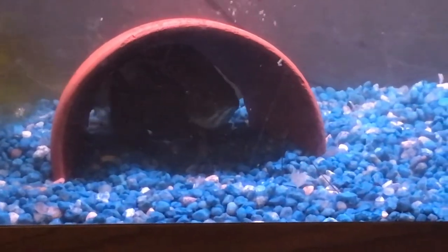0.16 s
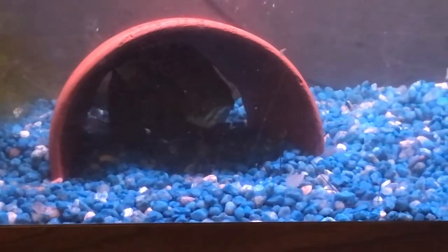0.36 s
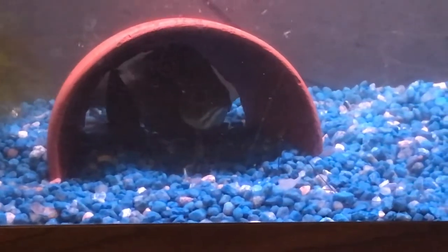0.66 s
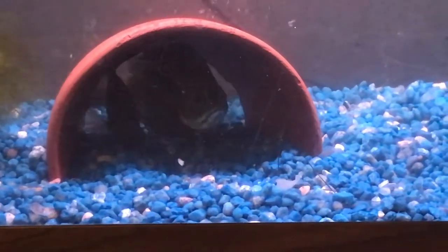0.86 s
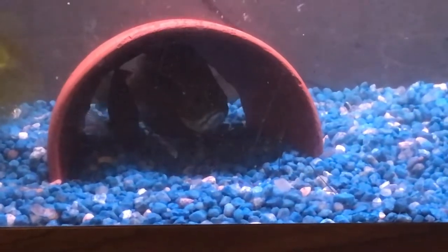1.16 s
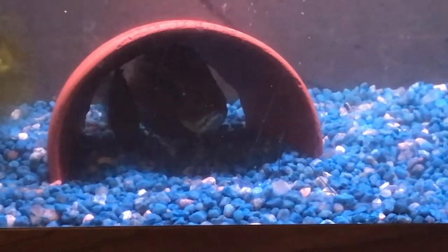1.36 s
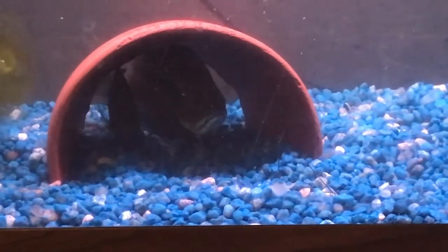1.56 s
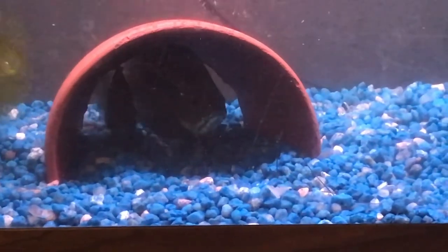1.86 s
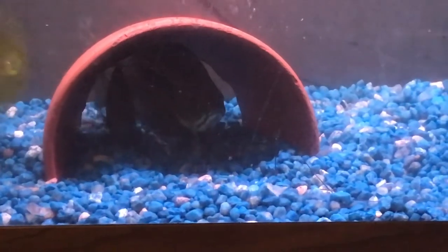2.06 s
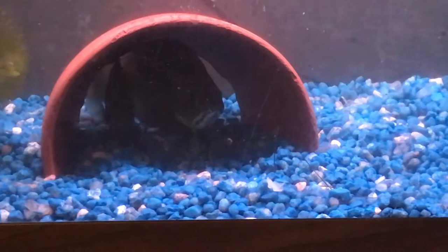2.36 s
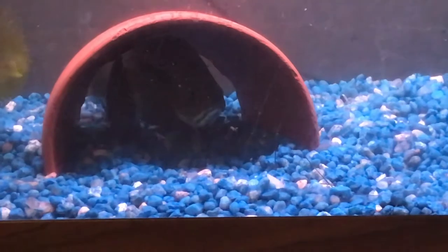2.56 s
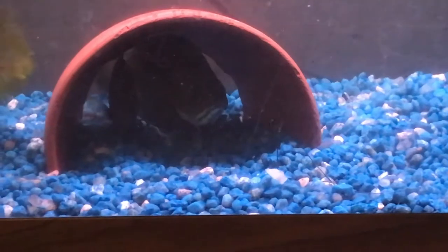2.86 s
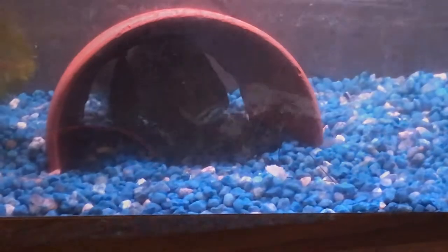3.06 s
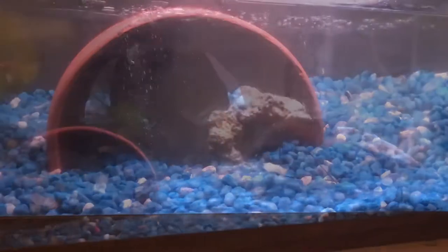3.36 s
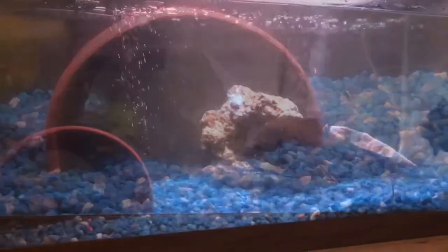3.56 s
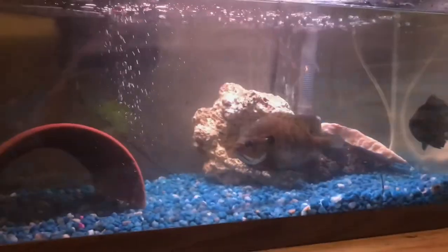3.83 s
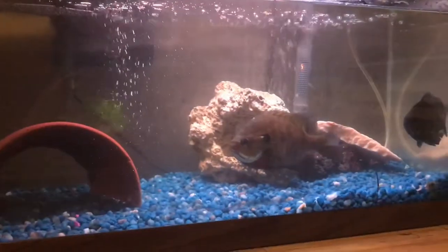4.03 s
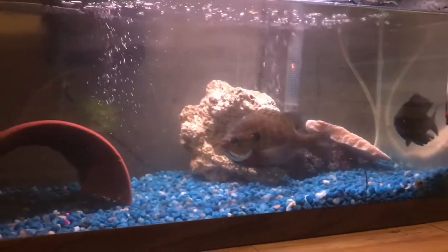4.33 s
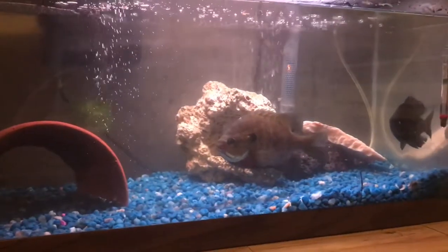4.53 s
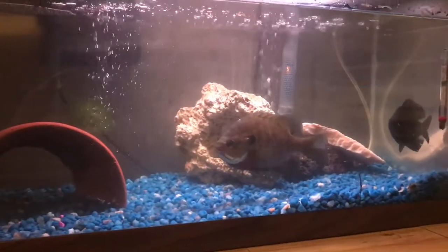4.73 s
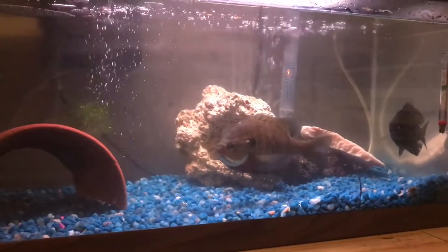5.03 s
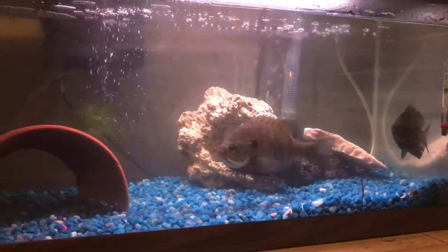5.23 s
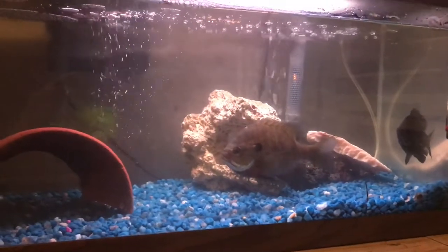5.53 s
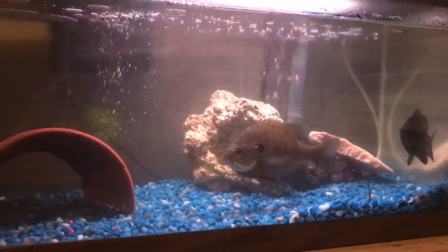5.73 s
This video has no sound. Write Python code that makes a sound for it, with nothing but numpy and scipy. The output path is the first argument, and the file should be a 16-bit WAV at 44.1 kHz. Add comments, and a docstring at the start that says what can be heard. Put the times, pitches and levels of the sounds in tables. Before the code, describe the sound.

From 0 to about 3 seconds, a microphone close to an aquarium picks up a steady low electric hum from an air pump, with a lumpy cabinet rumble that swells slowly, about twice a second. Soft water hiss lies over it. Short, bright, high-pitched bubbles plip irregularly, the stronger ones near 0.2, 0.8, 1.2, 1.8 and 2.5 seconds, among fainter neighbours and fine, crisp bursting ticks. Between 3 and 4 seconds the pump fades smoothly while a quieter sound from the front glass rises. From 4 to 6 seconds there is only faint mains hum and low soft noise, with weaker bubbles and delicate ticks, busier around 5.3 to 5.8 seconds. Fizz surges in small clusters near 4.5, 5.3 and 5.7. A filter impeller rattles dully in short, uneven, buzzing bouts, several a second. The room is quiet, with only a tiny glassy echo.

```python
"""An aquarium in a quiet room. First one hears the air pump's hum, a cabinet rumble and hissing water.
All along, bubbles ring at the surface (dying sine waves) and burst with fine ticks (short puffs of noise).
From about 3 to 4 s this cross-fades to the front glass: a faint mains hum made of overtones, softer water
with fizz in clusters, and a filter whose impeller rattles in bouts (noise knocks through two resonances)."""
import sys
import numpy as np
from scipy import signal
from scipy.fft import rfft, irfft, next_fast_len
from scipy.io import wavfile
from scipy.ndimage import uniform_filter1d, map_coordinates

SR = 44100
rng = np.random.default_rng(int(sys.argv[2]) if len(sys.argv) > 2 else 0)


def transcribe(u):
    """Save the signal u as a 16-bit wav file named by the first command-line argument.

    u: samples, shape (n,) or (channels, n), limited to [-1, 1]; the rate is SR.
    q: integer samples, one column per channel.
    """
    v = np.clip(np.atleast_2d(u).T, -1, 1)
    q = np.round(v * 32767).astype(np.int16)
    wavfile.write(sys.argv[1], SR, q)


N = 259749
TIME = np.arange(N) / SR  # seconds

# The cross-fade from the pump side to the front glass: start_s, end_s
FADE_S = (2.95, 3.994)
MAINS_HZ = 60.0
TOP_HZ = 15710  # nothing sounds above this
FRONT_FAINTER_DB = -4  # the faint bubbles are farther from the front glass


def amp(db):
    """Turn a level in dB into a gain."""
    return 10 ** (np.asarray(db) / 20)


def unit(x):
    """Scale to an rms of 1."""
    return x / np.sqrt(np.mean(x ** 2) + 1e-20)


def front_share(time_s):
    """Share of the front glass in the cross-fade: 0 before it, 1 after it."""
    return np.interp(time_s, FADE_S, (0, 1))


def wobble(rate):
    """A smooth random curve through `rate` random points a second."""
    points = rng.standard_normal(int(N * rate / SR) + 4)
    return map_coordinates(points, [TIME * rate])


def smoothed(x, first, second, axis=1):
    """Two moving averages, which soften fast changes."""
    return uniform_filter1d(uniform_filter1d(x, size=first, axis=axis), size=second, axis=1)


def filtered(x, response):
    """Filter x by a gain (it may be complex) that depends on frequency in Hz."""
    size = next_fast_len(N + SR // 2)
    hz = np.fft.rfftfreq(size, 1 / SR)
    return irfft(rfft(x, size) * response(hz), size)[:N]


def rush(spectrum, patchy_db):
    """Noise of rms 1, coloured by a spectrum, with random louder and softer patches in time and pitch."""
    grid = signal.stft(rng.standard_normal(N), nperseg=256)[2]
    patches = unit(smoothed(rng.standard_normal(grid.shape), 8, 6, axis=0))
    noise = signal.istft(grid * amp(patchy_db * patches), nperseg=256)[1][:N]
    hz, db = np.transpose(spectrum)
    return unit(filtered(noise, lambda f: amp(np.interp(np.log(f + 1), np.log(hz), db, -120, -120))))


def tones(rows, base_hz, unsteady_db, drift):
    """Sines at (multiple, rms dB) that waver in level and phase (turns), higher multiples more, up to 10."""
    total = 0
    for multiple, db in rows:
        gain = np.sqrt(2) * amp(db + unsteady_db * wobble(3.15))
        turns = multiple * base_hz * TIME + rng.random() + drift * min(multiple, 10) * wobble(14)
        total = total + gain * np.sin(2 * np.pi * turns)
    return total


def placed(times, shapes):
    """Add up short sounds, one per row, each at its start time in seconds."""
    at = np.round(times * SR).astype(int)[:, None] + np.arange(shapes.shape[1])
    return np.bincount(at.ravel(), shapes.ravel(), N + shapes.shape[1] + SR)[:N]


def rings(rows, glide, attack):
    """Bubbles ring as dying sines: rows (start s, dB, pitch Hz, s to fall 60 dB); each pitch glides at random."""
    hold = 1.7  # over 1: a bubble holds its level before it dies
    rough = .2  # churning water makes each ring flutter: share of its level
    start, db, hz, t60 = np.transpose(rows)[..., None]
    t = np.arange(SR // 16) / SR
    life = np.clip(t60, .004, .06)
    bend = glide * rng.standard_normal((len(rows), 1)) * t / life
    flutter = 1 + rough * unit(smoothed(rng.standard_normal((len(rows), len(t))), 40, 40))
    level = flutter * amp(db - 60 * (t / life) ** hold) * (1 - np.exp(-t / attack))
    return placed(start[:, 0], level * np.sin(2 * np.pi * hz * t * (1 + bend)))


def swarm(count, db, spread_db, hz, octaves, cycles):
    """Rows (start s, dB, pitch Hz, life s) of many events of scattered time, level and pitch."""
    shift, size, pitch = rng.standard_normal((count, 3)).T
    start = (np.arange(count) + .5 + 3 * shift) / count % 1 * N / SR
    pitch_hz = np.minimum(hz * 2 ** (octaves * pitch), TOP_HZ)
    return np.transpose([start, db + spread_db * np.clip(size, -2, 2), pitch_hz, cycles / pitch_hz])


def room(x):
    """The glass and the room add a short tail of fading noise echoes."""
    t60_s = 0.046
    t = np.arange(SR // 5) / SR
    tail = rng.standard_normal(len(t)) * amp(-60 * t / t60_s) * (t > .003)
    return x + amp(-8.5) * signal.fftconvolve(x, tail / np.linalg.norm(tail))[:N]


def pump_side():
    """The diaphragm hums at twice the mains over a lumpy cabinet rumble, the water's hiss and fine fizz."""
    # Pump hum: multiple of mains, level_db (rms)
    pump_tones = [(2, -39.5)]
    # Other steady tones beside the pump: pitch_hz, level_db (rms)
    whines = [(138, -58), (1233, -76), (1470, -84), (1938, -86)]
    # Spectrum of the cabinet rumble: pitch_hz, relative level_db per Hz
    throb = [(22, -40), (35, -4), (60, -12.5), (125, 1), (152, -4), (175, 0.5), (210, -12.5), (250, -11),
             (275, -15), (300, -12), (325, -14.5), (345, -14), (358, -8.5), (375, -15), (400, -21),
             (480, -26), (700, -36)]
    # Spectrum of the water close by: pitch_hz, relative level_db per Hz
    water_near = [(260, -40), (450, -1), (530, -6.5), (572, 0), (586, -2), (600, 4), (614, -3), (650, -2),
                  (740, -5), (878, -4), (1140, -4.5), (1230, -5), (1370, -7.8), (1980, -11), (2590, -16.5),
                  (3380, -14.5), (4970, -18.5), (6300, -18.5), (9390, -21.5), (10600, -26), (15600, -28)]
    hum = tones(pump_tones, MAINS_HZ, unsteady_db=0.0, drift=.008)
    whine = tones(whines, 1, unsteady_db=2.5, drift=.008)
    rumble = amp(-47 + 0.52 * wobble(11)) * rush(throb, patchy_db=0.9)
    hiss = amp(-59.5 + 0.4 * wobble(12)) * rush(water_near, patchy_db=1.4)
    small_bubbles = swarm(count=900, db=0, spread_db=2.8, hz=4300, octaves=.45, cycles=50)
    fizz = unit(rings(small_bubbles, glide=0.043, attack=0.00085))
    return hum + whine + rumble + hiss + amp(-72) * room(fizz)


def low_hum(share):
    """The motor slips just under the mains: by the pump it swells slowly, at the front it beats with mains hum."""
    motor_hz, motor_db = 58.8, -48.6
    swell_depth, swell_hz, crest_s = .33, 1.8, 1.1  # depth 0-1, swells a second, time of one crest
    front_mains_db, front_motor_db = -58.5, -67
    cancel_s = 4.77  # a moment when the two front hums cancel most
    angle = 2 * np.pi * np.outer([motor_hz, MAINS_HZ], TIME - cancel_s)
    motor, mains = np.sqrt(2) * np.sin(angle)
    swell = 1 + swell_depth * np.cos(2 * np.pi * swell_hz * (TIME - crest_s))
    near = amp(motor_db + 1.1 * wobble(5)) * swell * motor
    front = amp(front_mains_db) * mains - amp(front_motor_db) * motor
    return (1 - share) * near + share * front


def bubbles():
    """Clear and faint bubbles each ring as a close pair with a short pop, among a few fainter neighbours."""
    # The clear bubbles: start_s, level_db (before the trims below), pitch_hz
    clear = [(0.0453, -50.5, 3070), (0.0488, -53, 5260), (0.16, -48, 3230), (0.1845, -39, 3350),
             (0.2538, -48, 3100), (0.2927, -48.5, 3310), (0.2992, -44.5, 1970), (0.3326, -49, 3350),
             (0.3875, -48, 2130), (0.6524, -54, 3300), (0.7607, -37, 3330), (1.0665, -53, 3120),
             (1.0854, -52, 2800), (1.1927, -40, 3240), (1.3094, -53, 3370), (1.3314, -43, 3500),
             (1.3593, -51, 6010), (1.3912, -46.5, 2990), (1.4586, -53, 2990), (1.5239, -49, 3350),
             (1.5439, -41, 3330), (1.6526, -52, 5110), (1.71, -50, 3090), (1.7878, -51, 3120),
             (1.8257, -38, 4330), (2.0687, -41.5, 2980), (2.1241, -52, 3180), (2.125, -52, 4300),
             (2.1944, -48, 3570), (2.2383, -50, 3800), (2.2553, -42, 3040), (2.3281, -52, 5210),
             (2.3291, -52, 4430), (2.5122, -38, 3290), (2.5541, -52, 5580), (2.6594, -51, 3130),
             (2.7048, -51, 3330), (2.8883, -53, 3270), (2.9936, -52, 4300), (3.033, -45, 3350),
             (3.0834, -52, 6940), (3.0899, -44.5, 3060), (3.1388, -47, 3130), (3.1428, -50.5, 5830),
             (3.1842, -53, 4330), (3.2824, -47.5, 4250), (3.3268, -53, 4160), (3.3653, -51.5, 3220),
             (3.5324, -53, 3330), (3.932, -55, 2910), (4.0567, -53, 4550), (4.2113, -58, 3650),
             (4.4508, -56, 3480), (4.5246, -55, 3480), (4.5715, -58, 4130), (4.683, -57, 4120),
             (4.9721, -55, 4190), (5.0759, -56, 3420), (5.3018, -58, 2740), (5.3133, -51, 3090),
             (5.3462, -46, 4030), (5.455, -54, 4120), (5.6156, -49, 3520), (5.6705, -49, 4450),
             (5.7254, -55, 3050), (5.8002, -57, 3530), (0.0912, -55, 3480), (0.3591, -56, 3360),
             (0.5003, -56, 3430), (0.6, -56, 3330), (0.7457, -54, 3300), (0.9378, -57, 4700),
             (1.2805, -56, 5430), (2.0323, -55, 3310), (2.136, -51, 3150), (2.136, -55, 5900),
             (2.4548, -56, 4730), (2.7551, -55, 3310), (3.0135, -53, 2930), (3.4191, -58, 3310),
             (3.8627, -58, 3380), (4.1117, -60, 3150), (4.2533, -61, 3380), (4.4983, -62, 3030),
             (4.575, -59, 3550), (4.8764, -61, 3450), (4.9518, -58, 4090), (5.1129, -60, 3500),
             (5.1363, -59, 2790), (5.2506, -59, 2810), (5.375, -59, 4300), (5.455, -59, 2850),
             (5.6251, -60, 6180), (5.685, -57, 4100), (5.8667, -61, 3470)]
    ring_s, shorter_s_per_db = .025, .0005  # life of a -50 dB bubble; louder ones die sooner
    ring_hz = 4500  # bubbles pitched above this also die sooner
    faint = swarm(count=100, db=-62.5, spread_db=1.5, hz=3350, octaves=.09, cycles=1)[:, :3]
    faint[:, 1] += FRONT_FAINTER_DB * front_share(faint[:, 0])
    rows = np.vstack([clear, faint])
    life = (ring_s - shorter_s_per_db * (rows[:, 1] + 50)) * np.minimum(ring_hz / rows[:, 2], 1)
    rows = np.column_stack([rows, life])

    # columns: start, level, pitch, life
    twins = rows * [1, 1, 1, .8] - [0, 6, 0, 0]
    twins[:, 2] *= 2 ** (.08 * rng.standard_normal(len(rows)))
    pops = rows * [1, 1, 1.15, .15] - [0, 14, 0, 0]  # so short that the pitch blurs

    # three neighbours for each bubble
    start, db, hz, t60 = np.repeat(rows, 3, axis=0).T
    lag, size, pitch = rng.standard_normal((len(start), 3)).T
    near_start = np.abs(start + .01 + .014 * lag)
    near_db = .5 * db - 38 + 2 * np.clip(size, -2, 1.5) + FRONT_FAINTER_DB * front_share(start)
    near_hz = hz * 2 ** (.06 + .2 * pitch)
    neighbours = np.transpose([near_start, near_db, near_hz, .55 * t60])

    pairs = amp(-2.7) * rings(np.vstack([rows, twins]), glide=.03, attack=.003)
    popping = rings(pops, glide=.04, attack=.0003)
    return pairs + popping + amp(-1.5) * rings(neighbours, glide=0.047, attack=.0012)


def puffs(rows):
    """A bursting film is a short puff of noise around its centre pitch; the louder, the longer."""
    wide = .16  # broadband crack at the start of a burst, against its narrow puff
    start, db, hz = np.transpose(rows)[:3, :, None]
    t = np.arange(SR // 16) / SR
    noise = rng.standard_normal((len(rows), len(t)))
    crack = wide * rng.standard_normal(noise.shape) * amp(-60 * t / .04)
    band = smoothed(noise, 10, 6) + crack
    life = .034 * amp(0.15 * (db + 53.5))  # seconds to fall 60 dB
    swell = amp(db + 9.6 - 60 * t / life) * (1 - np.exp(-t / 0.0007))
    return placed(start[:, 0], swell * band * np.cos(2 * np.pi * hz * t))  # the cosine moves the noise up to hz


def ticks(share):
    """Clear film bursts over a spray of faint ones, which is softer at the front."""
    # The clear bursts: start_s, level_db (before the make-up gain in puffs), centre_hz
    bursts = [(0.0363, -54.5, 10100), (0.0857, -56, 9350), (0.1356, -55, 10060), (0.175, -54, 10100),
              (0.2982, -56, 13900), (0.7996, -58, 9400), (0.8654, -56, 9000), (1.3304, -59, 12400),
              (1.4775, -58, 9770), (1.5369, -52, 15000), (1.6681, -54.5, 9500), (1.8253, -58, 7500),
              (1.827, -57, 14500), (2.242, -56, 13200), (2.335, -58, 15000), (0.138, -58, 13500),
              (0.138, -57, 7000), (0.3, -59, 10000), (0.048, -57, 4000), (2.808, -58, 14500),
              (3.095, -58, 13000), (4.052, -60, 8500), (0.18, -58, 14000), (1.9001, -52.5, 9400),
              (2.2383, -51.5, 9300), (2.3231, -58, 15200), (2.8035, -52.5, 11500), (3.0889, -54, 9720),
              (3.93, -60, 9400), (4.0497, -58, 12700), (4.3365, -55, 13900), (5.4889, -56, 13500),
              (5.51, -53, 13500), (5.5722, -56, 13200), (5.5986, -57.5, 9810), (5.6705, -57, 9450),
              (0.2528, -59, 7000), (0.5062, -62, 14500), (0.5781, -58, 13500), (0.6165, -61, 8800),
              (0.9767, -60, 14500), (1.0685, -62, 14500), (1.1398, -61, 13500), (1.1583, -55, 4000),
              (0.8485, -58, 3000), (1.205, -59, 5000), (4.505, -60, 4500), (4.518, -61, 5500),
              (5.345, -58, 3600), (5.672, -56, 4500), (5.686, -59, 3600), (5.565, -61, 5500),
              (5.655, -62, 7000), (4.985, -61, 6500), (1.499, -59, 9000), (1.7878, -60, 6000),
              (2.0921, -60, 9100), (2.1196, -62, 14500), (2.1645, -59, 11500), (2.5287, -59, 12500),
              (2.5536, -59, 10000), (2.8649, -62, 15000), (2.9282, -60, 6000), (3.1837, -60, 13000),
              (3.2206, -62, 13500), (3.491, -64, 13500), (4.0906, -61, 12600), (4.4957, -63, 6000),
              (4.5989, -60, 13000), (5.3033, -63, 12000), (5.5159, -53, 12500), (5.707, -57, 4800),
              (5.8426, -64, 13000)]
    spray = puffs(swarm(count=400, db=-66.5, spread_db=2.5, hz=9000, octaves=.55, cycles=1))
    return puffs(bursts) + amp(-3 * share) * spray


def front_side():
    """Faint mains overtones, hissing noise, the rattling filter and fizz that surges in clusters."""
    # Hum at the front: multiple of mains, level_db (rms)
    front_tones = [(2, -71), (3, -68.5), (4, -71.5), (5, -71), (6, -71), (10, -78)]
    # Spectrum of the noise at the front: pitch_hz, relative level_db per Hz
    water_front = [(15, -35), (25, -19.5), (59, -4), (107, -7.5), (369, -6), (552, -16.5), (946, -15.5),
                   (1140, -21), (1670, -19.5), (2120, -30), (2300, -22.5), (2490, -29), (10400, -35.5),
                   (12500, -37.5), (15600, -38.5)]
    # Clusters of fizz: centre_s, level_db (added to the quiet fizz)
    clusters = [(3.8, -79), (4.08, -79), (4.51, -74), (4.58, -75), (4.97, -77), (5.13, -78), (5.31, -74),
                (5.38, -76), (5.68, -73.5), (5.87, -78)]
    cluster_s, quiet_fizz_db = .025, -83  # spread in time of a cluster; level between them
    hum = tones(front_tones, MAINS_HZ, unsteady_db=1.0, drift=.022)
    hiss = amp(-59.5 + 0.68 * wobble(11)) * rush(water_front, patchy_db=1.9)
    small_bubbles = swarm(count=2200, db=0, spread_db=3, hz=4000, octaves=.4, cycles=38)
    fizz = unit(rings(small_bubbles, glide=.05, attack=.001))
    surge = amp(quiet_fizz_db)
    for centre_s, db in clusters:
        surge = surge + amp(db) * np.exp(-.5 * ((TIME - centre_s) / cluster_s) ** 2)
    return hum + hiss + room(rattle() + surge * fizz)


def rattle():
    """In bouts the impeller knocks its housing twice per mains cycle, unevenly; it never quite stops."""
    # Bouts of rattle: start_s, length_s, level_db (before the gains below)
    bout_rows = [(3.552, 0.038, -70), (3.612, 0.034, -71), (3.706, 0.03, -69), (3.734, 0.03, -72),
                 (3.815, 0.044, -69), (3.899, 0.044, -64), (3.937, 0.07, -65), (4.013, 0.044, -68),
                 (4.103, 0.046, -62), (4.143, 0.064, -64), (4.21, 0.05, -69), (4.3, 0.054, -66),
                 (4.346, 0.048, -64), (4.41, 0.05, -65), (4.504, 0.032, -68), (4.532, 0.038, -68),
                 (4.59, 0.03, -70), (4.614, 0.042, -65), (4.697, 0.074, -65), (4.839, 0.03, -68),
                 (4.907, 0.074, -64), (5.013, 0.05, -63), (5.094, 0.038, -65), (5.124, 0.048, -68),
                 (5.214, 0.044, -66), (5.296, 0.044, -70), (5.33, 0.044, -71), (5.507, 0.04, -63),
                 (5.539, 0.048, -64), (5.609, 0.036, -69), (5.701, 0.03, -65), (5.747, 0.056, -62),
                 (5.797, 0.036, -71)]
    # Resonances of the filter housing: pitch_hz, width_hz, relative level_db (before squaring)
    housing_rows = [(1640, 500, 1), (2330, 230, -5.6)]
    between_db = -78  # the rattle between bouts
    # a bout rises, sags, and starts to fall a little before its end
    rise_s, sag_s, early_s, fall_s = .012, .12, .016, .005
    start, length, db = np.transpose(bout_rows)[..., None]
    t = np.arange(SR // 6) / SR
    ending = np.maximum(t - length + early_s, 0) / fall_s
    shape = np.minimum(t / rise_s, 1) ** 2 * np.exp(-t / sag_s - ending)
    faded = np.maximum(front_share(start), .5)  # early bouts are raised against the cross-fade, at most twofold
    bouts = placed(start[:, 0], amp(db + 1.9) / faded * shape) + amp(between_db + 3 * wobble(18))

    beat = 2 * MAINS_HZ * TIME  # counts the knocks
    strength = amp(1.4 * rng.standard_normal(int(beat[-1]) + 1))[beat.astype(int)]
    knocks = strength * np.exp(-(beat % 1) / .46) * rng.standard_normal(N)

    def housing(f):
        """Each resonance lets through a band around its own pitch."""
        return sum(amp(gain_db) * 1j * f * width / (centre * centre - f * f + 1j * f * width)
                   for centre, width, gain_db in housing_rows)

    loudness = np.sqrt(np.mean(bouts ** 2))
    return loudness * unit(filtered(bouts * knocks, lambda f: housing(f) ** 2))  # thick walls: steep resonances


def scene():
    """Both places, cross-faded, with the low hum, the single bubbles and the ticks."""
    share = front_share(TIME)
    places = (1 - share) * pump_side() + share * front_side()
    surface = room(bubbles() + ticks(share))
    return (places + low_hum(share) + surface)[None]


def record(dry):
    """The microphone drops the deep bass and dips in the treble; nothing passes above the band limit."""
    # Dip in the treble: centre_hz, width_hz, depth (0-1)
    notch = (10430, 370, 0.33)
    low_hz = 29.6  # the bass falls away below about this
    centre, width, depth = notch

    def colour(hz):
        """Gain of the microphone at each frequency."""
        dip = 1 - depth * np.exp(-((hz - centre) / width) ** 2)
        bass_cut = 1 - np.exp(-(hz / low_hz) ** 4)
        return dip * bass_cut * (hz < TOP_HZ)

    return filtered(dry[0], colour)[None]


dry = scene()
out = record(dry)
transcribe(out)
```